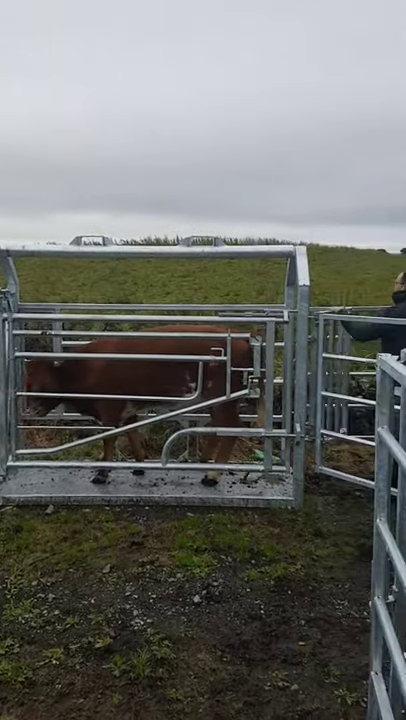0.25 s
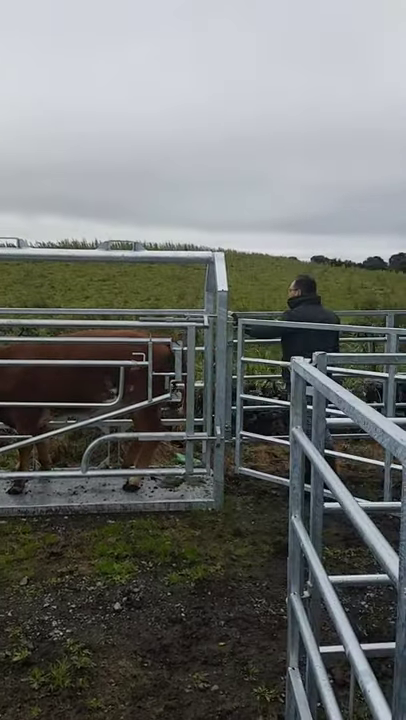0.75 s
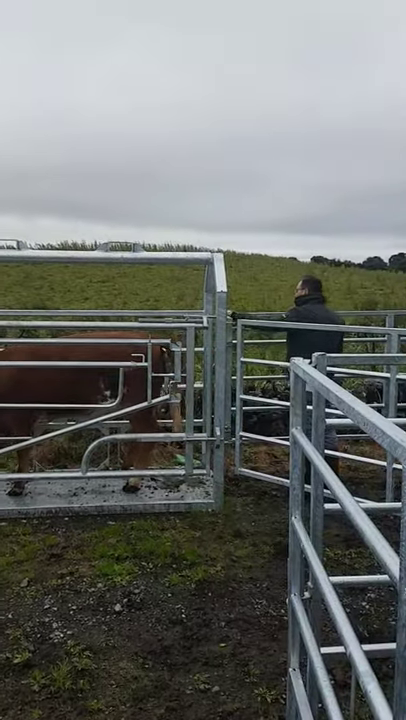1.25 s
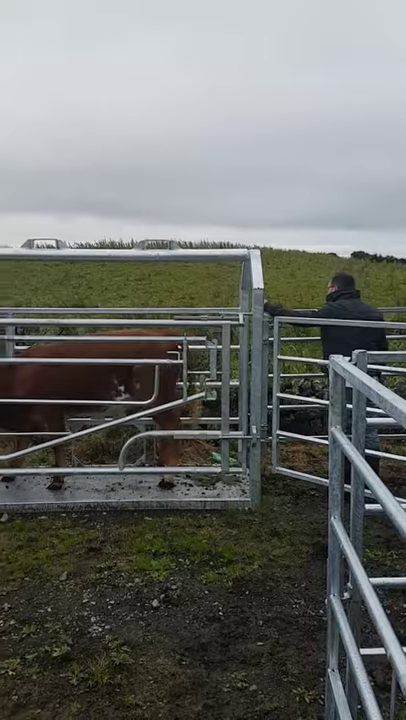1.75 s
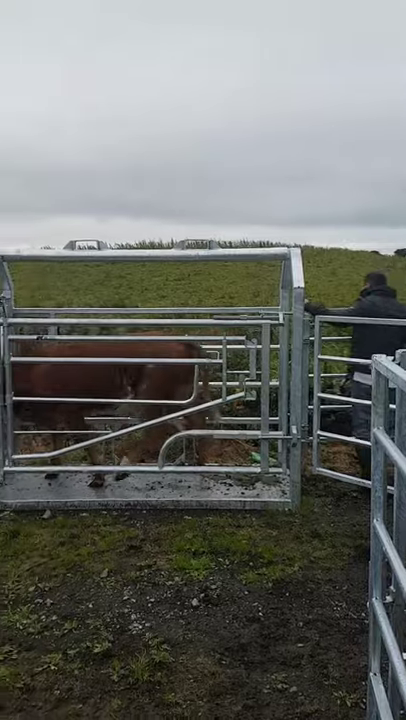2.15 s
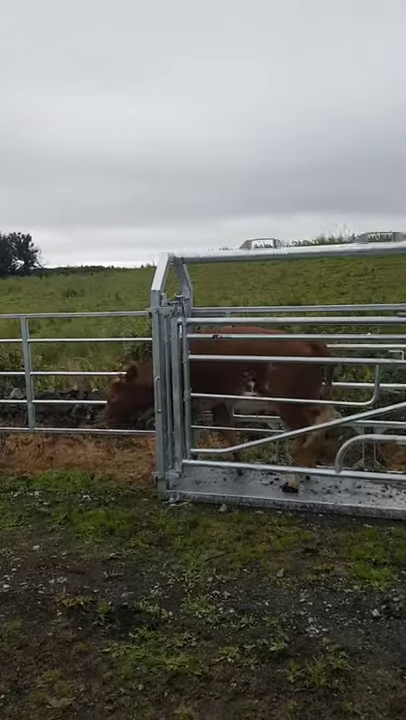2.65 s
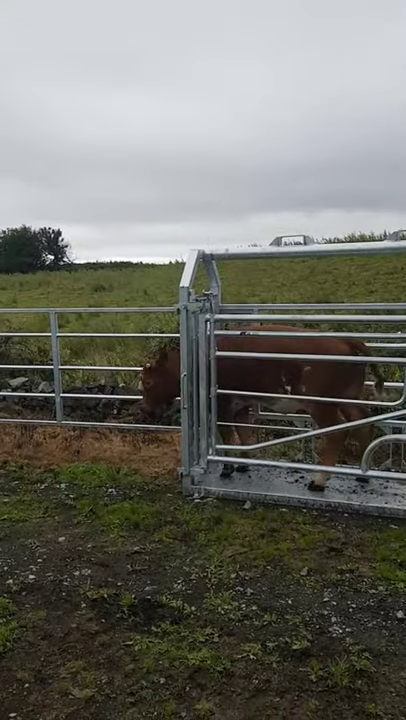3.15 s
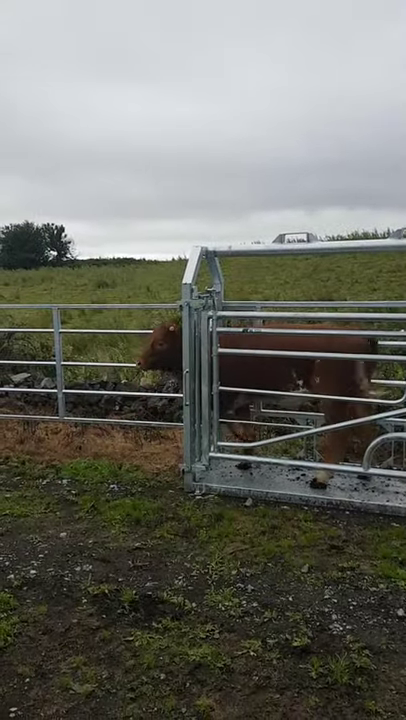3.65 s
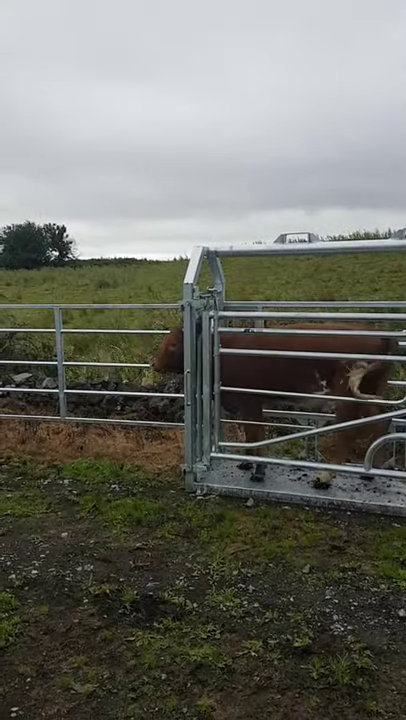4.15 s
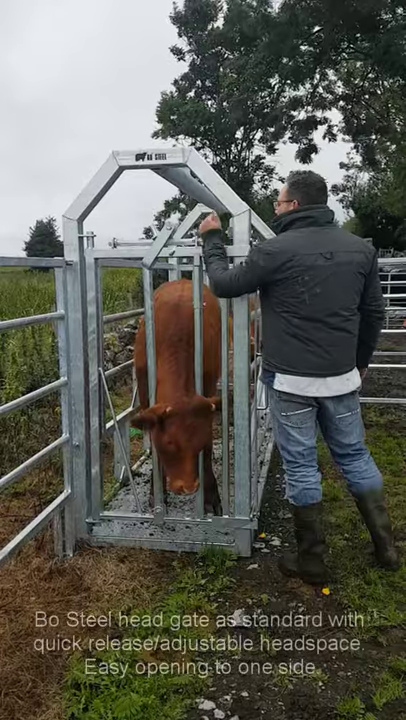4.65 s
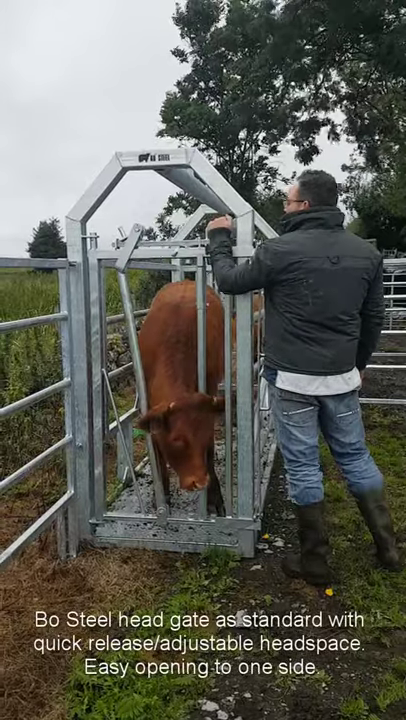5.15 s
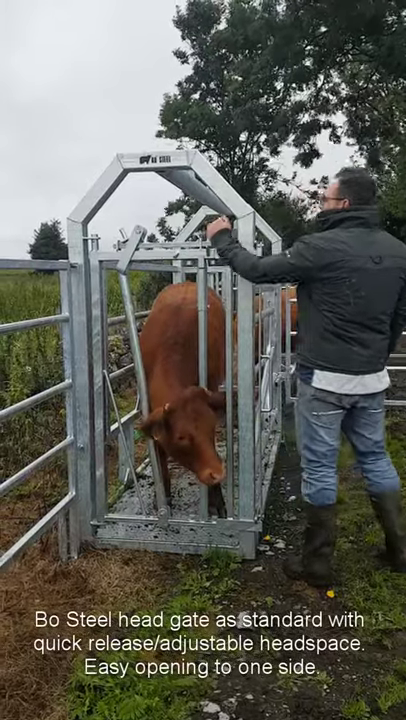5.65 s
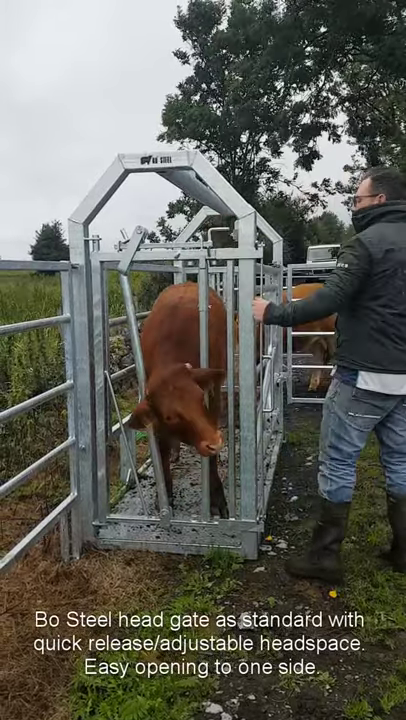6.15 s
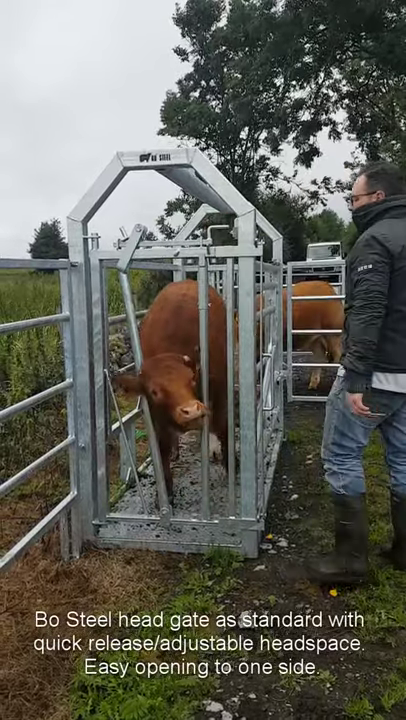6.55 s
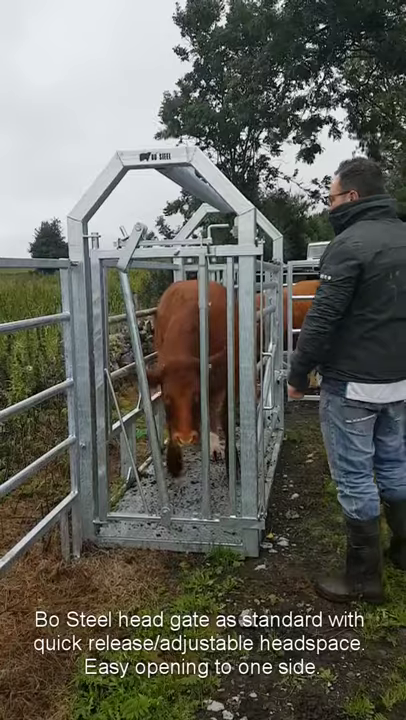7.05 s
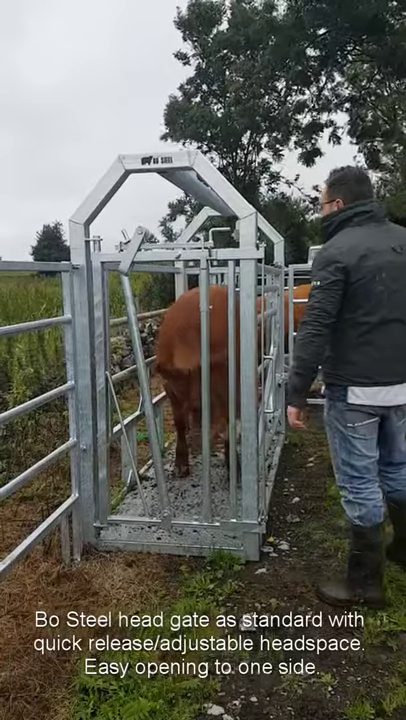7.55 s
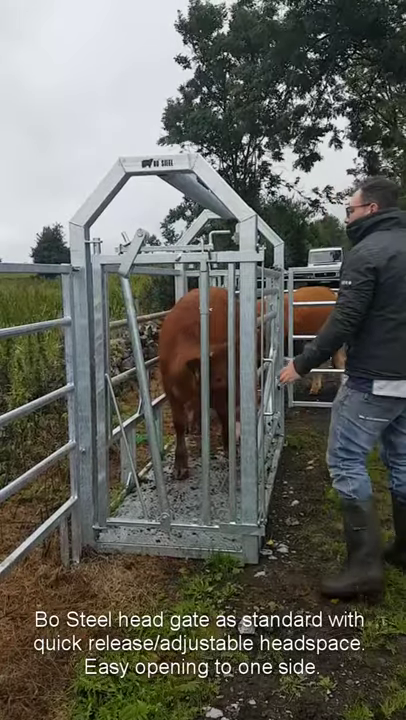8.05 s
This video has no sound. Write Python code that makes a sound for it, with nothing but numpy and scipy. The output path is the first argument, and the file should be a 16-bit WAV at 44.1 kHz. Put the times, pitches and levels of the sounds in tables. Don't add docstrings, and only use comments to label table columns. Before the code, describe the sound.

Hollow steel tubes and loose joints bang and jingle in open air. Two big clashes come early, the second stretch is a rapid chain of hard ratchet clacks with lingering ring. A brief dropout follows, then a moderate cluster of gate knocks and a quick scrape, dying into isolated soft thuds of hooves on a metal floor and small clinks. Wind rumbles unevenly at the stereo microphone; very dry, no echo.

```python
import sys
import numpy as np
from scipy import signal
from scipy.fft import rfft, irfft
from scipy.io import wavfile
from scipy.ndimage import uniform_filter1d

SR = 44100
rng = np.random.default_rng(int(sys.argv[2]) if len(sys.argv) > 2 else 0)


def unload_wav(signal):
    wavfile.write(
        sys.argv[1],
        SR,
        np.round(np.clip(np.atleast_2d(signal).T, -1, 1) * 32767).astype(np.int16),
    )


def boost_factor(decibels):
    exponent = np.asarray(decibels, float) / 20
    return 10 ** exponent


N = 366456
TIME = np.arange(N) / SR
FREQ = np.fft.rfftfreq(N, 1 / SR) + 1e-3

# start_s, end_s
CUT_S = (4.3675, 4.4015)
# start_s, peak_db, panel_hz, t60_s
BLOWS = [(.171, -49, 1490, .06), (0.318, -44.5, 1200, .06), (.589, -44.5, 1400, 0.058),
         (0.2464, -33.5, 2900, 0.097), (0.602, -42, 2850, 0.33), (.653, -32, 1700, 0.2),
         (.714, -15.5, 1260, 0.39), (.824, -5.5, 2380, 0.14), (.854, -19.5, 1310, 0.17),
         (.919, -9.5, 720, 0.076), (1.288, -37, 1220, 0.85), (1.738, -25, 2280, 0.33),
         (1.824, -40, 4800, 0.13), (1.834, -35.5, 6150, 0.28), (1.86, -28.5, 1780, 0.54),
         (2.035, -29, 800, 0.063), (2.048, -21, 900, 0.13), (2.289, -26, 746, 0.2),
         (2.319, -29, 1270, 0.16), (2.358, -27.5, 1310, 0.039), (2.446, -31.5, 3000, 0.057),
         (2.452, -17.5, 1150, 0.25), (2.465, -19.5, 2710, 0.31), (2.509, -21.5, 1770, 0.62),
         (2.617, -21, 4080, 0.05), (2.631, -19, 1100, 0.12), ]
# start_s, peak_db, panel_hz, t60_s
RATCHET = [(2.705, -18.5, 1740, 0.12), (2.735, -8, 770, 0.05), (2.738, -23, 2500, 0.047),
           (2.783, -18, 3000, .05), (2.791, -13, 1510, .04), (2.757, -15.5, 770, 0.053),
           (2.781, -14.5, 900, 0.094), (2.804, -13, 930, 0.052), (2.808, -20.5, 3800, .04),
           (2.815, -11.5, 1270, 0.034), (2.825, -10, 890, 0.1), (2.847, -5, 900, 0.082),
           (2.862, -9, 885, 0.058), (2.872, -10, 802, 0.057), (2.878, -15, 2900, .05),
           (2.898, -12.5, 940, 0.036), (2.905, -20, 2000, .04), (2.921, -18, 850, 0.054),
           (2.957, -23.5, 2880, 0.086), (3.013, -24, 795, 0.17), (3.062, -17.5, 720, 0.19),
           (3.096, -15.5, 783, 0.11), (3.11, -18.5, 1290, 0.083), (3.134, -25, 1430, .08),
           (3.197, -26, 1680, 0.62), (3.276, -35, 2660, .2), (3.304, -30.5, 950, 0.36),
           (3.409, -43.5, 2670, 0.5), (3.693, -29.5, 2920, 0.17), (3.999, -30, 840, 0.14)]
# start_s, peak_db, panel_hz, t60_s
GATE_BLOWS = [(4.641, -29.5, 1320, 0.072), (4.667, -19.5, 634, 0.075), (4.702, -20, 1000, 0.1),
              (4.745, -23, 900, .08), (4.766, -23, 1410, .06), (4.79, -18.5, 730, 0.075),
              (4.825, -19, 1300, 0.05), (4.857, -18, 1114, 0.075), (4.864, -19.5, 1930, 0.24),
              (4.893, -25, 2020, .1), (4.93, -24.5, 1200, 0.72), (4.962, -25, 1155, 0.3),
              (5.015, -28, 720, 0.11), (5.112, -26.5, 1990, 0.11), (5.07, -23, 670, 0.7),
              (5.1549, -28, 2800, 0.27), (5.335, -24, 1210, 0.13), (5.929, -35.5, 1110, 0.19),
              (6.2716, -32, 3830, 0.2), (6.325, -35.5, 1300, .12), (6.3566, -36.5, 4050, 0.24),
              (6.6777, -35.5, 2130, 0.085), (6.681, -40, 5600, 0.22), (6.721, -39, 630, 0.17),
              (6.763, -25.5, 910, 0.1), (7.066, -37.5, 650, 0.28), (7.176, -28.5, 970, 0.16),
              (7.209, -32, 694, 0.18), (7.317, -40.5, 715, 0.18), (7.419, -42.5, 1160, 0.21),
              (8.2234, -25.5, 1970, 0.12), (8.236, -29.5, 2800, 0.55), (8.249, -35.5, 1100, 0.75)]
# start_s, peak_db, jingle_db, t60_s
TICKS = [(0.0844, -43, -21, .043), (0.341, -42, -6, 0.071), (0.4855, -39.5, -12, 0.025),
         (.664, -46, -10.5, .04), (0.726, -37, -8.5, 0.068), (1.602, -53, -7, 0.034),
         (1.828, -44.5, -7.5, 0.11), (2.713, -32.5, -6, 0.07), (2.846, -27, -10.5, 0.079),
         (3.032, -35.5, -4, .1), (7.044, -56, -3, .03), (7.065, -53.5, 0, 0.038), (7.194, -49.5, -2, .04),
         (8.056, -61, 1, .03), (8.091, -65, -5, 0.037), (4.601, -58, -6, .02), (0.821, -20, -6.5, 0.37),
         (1.1192, -40, -5.5, 0.055), (1.451, -42, -18.5, 0.078), (1.524, -32.5, -10, 0.025),
         (2.008, -33, -15, 0.2), (2.451, -32.5, -8.5, 0.45), (2.592, -41, 1, 0.11),
         (3.501, -40.5, -11.5, 0.23), (4.136, -47, -13, 0.22), (4.258, -46, -15.5, 0.08),
         (4.7023, -31.5, -11.5, 0.14), (4.825, -29, -10, 0.045), (4.861, -35, -6, 0.14),
         (4.969, -41, 4, 0.04), (5.1097, -46, -14, 0.038), (5.157, -40.5, -7, 0.24),
         (6.872, -37, -18.5, .15), (6.971, -38.5, -24, 0.32), (7.092, -46.5, -2, 0.04),
         (7.3718, -34, -36, 0.2), (7.5403, -44, -38, 0.084), (7.7228, -44, -37, 0.099),
         (7.818, -52, -10, .075), (8.176, -40.5, -25, 0.19)]
# fullest_s, level_db, build_s, hold_s, jingle_db
SHAKES = [(0.859, -21, 0.21, .0, -23.5), (1.737, -53, 0.05, 0.13, -23), (2.048, -32.5, 0.046, .0, -17.5),
          (2.864, -28.5, 0.76, 0, -19), (3.1, -30.5, 0.53, 0.019, -19.5), (4.667, -32, 0.019, 0.14, -20),
          (4.85, -39.5, .02, 0.095, -38), (5.085, -35, 0.21, 0.027, -27), (1.642, -51, 0.15, 0.091, -28),
          (2.854, -38, .005, 0.012, -9.5), (0.252, -56, 0.036, 0.053, -41), (1.063, -61, 0.044, 0.17, -47)]
# pitch_hz, level_db
STEEL = [(260, -34), (450, -11.5), (541, -15), (737, -4), (1370, -8.5), (1790, -6.5), (2000, -10),
         (2410, -7.5), (3320, -16), (7000, -37), (9100, -44.5), (15400, -120)]
# pitch_hz, level_db
JINGLE = [(2650, -13.5), (4500, -5.5), (4870, -6), (5680, -10.5), (7330, -13), (8550, -12.5), (10500, -15),
          (13400, -11), (14900, -23.5), (16000, -29)]
# pitch_hz, level_db
TINKLE = [(5000, -1), (13000, 1.5)]
# pitch_hz, level_db
SCRAPE = [(4300, -42), (4800, -5), (5150, 2), (5550, -9), (6200, 2), (6800, -20), (7500, -12), (11000, -11),
          (14000, -3), (15500, -14)]
# start_s, peak_db, plate_hz, t60_s
HOOVES = [(0.632, -18.5, 154, 0.1), (0.837, -28, 342, 0.2), (2.048, -25, 394, 0.49),
          (2.857, -11, 725, 0.34), (3.092, -20, 694, 0.36), (3.996, -39.5, 146, 0.32),
          (4.701, -17.5, 510, 0.19), (4.788, -22, 485, 0.6), (5.927, -37.5, 522, 0.47),
          (6.33, -34, 620, 0.25), (6.716, -26, 149, 0.31), (6.721, -32, 560, 0.15),
          (6.761, -24.5, 530, 0.26), (6.801, -35.5, 176, 0.57), (7.064, -30, 204, 0.34),
          (7.087, -32.5, 330, 0.26), (7.204, -27.5, 174, 0.3), (7.315, -32, 177, 0.34),
          (7.41, -31, 161, 0.21), (8.172, -31.5, 473, 0.26), (8.223, -32, 523, 0.63)]
# start_s, end_s, level_db
GUSTS = [(.0, 0.207, -35.5), (0.278, 0.377, -33.5), (0.514, 0.7, -37.5), (0.72, 0.896, -35),
         (0.942, 1.224, -39.5), (1.382, 1.56, -47), (1.628, 1.924, -39), (2.021, 2.145, -34.5),
         (2.305, 2.585, -38.5), (2.638, 2.938, -35), (3.026, 3.346, -47), (3.443, 3.786, -56.5),
         (3.831, 3.916, -51), (4.026, 4.052, -42.5), (4.136, 4.39, -49.5), (4.45, 4.532, -46),
         (4.548, 4.655, -39), (4.71, 5.033, -41.5), (5.11, 5.445, -44), (5.523, 5.614, -37.5),
         (5.7, 5.96, -43), (5.993, 6.439, -43.5), (6.54, 6.837, -46), (6.906, 7.44, -61.5),
         (8.197, 8.31, -54)]
# pitch_hz, level_db
BUFFET = [(12, -29), (20, -6.5), (102, 2.5), (146, 0.5), (175, -3.5), (341, -7.5), (665, -27), (955, -58),
          (1500, -49.5), (1950, -43), (3300, -120)]
# pitch_hz, level_db
FIELD = [(35, -24.5), (60, 3), (172, -1), (244, -2.5), (515, -3), (749, -5.5), (822, -4.5), (4320, -25),
         (4970, -28), (6740, -32), (13000, -30), (16000, -29)]
# first_db, second_db
FIELD_DB = (-50.5, -52.5)
# first_db, second_db
RUSTLE_DB = (-6, -12.5)
LEFT_LAG = (2.6, 5.65)

# pitch_hz, level_db, t60_s
REAR_GATE = [(743, 1, .16), (851, -16, .8), (1007, -13, 1.6), (1125, -7, .3), (1297, 3, .16),
             (1410, -24, 1.1), (1583, -5, 2.2), (1739, -3, .36), (1809, -6, 1.3), (1841, -12, .6),
             (2008, -11, .48), (2342, -3, .25), (2810, -12, .36), (2760, -17, .9), (2907, -14, 1.1),
             (3020, -13, 1.0), (3413, -16, .43), (3639, -8, .6), (3758, -10, .45), (3962, -19, .2),
             (4290, -30, .8), (4823, -19, .8), (4852, -20, .8)]
# start_s, level_db
REAR_HITS = [
    (0.714, -45),
    (.824, -32),
]
# pitch_hz, level_db, t60_s
SIDE_FRAME = [(991, -17, 1.3), (1249, 0, 0.41), (1308, -22, 0.86), (1733, -1, 0.35), (1900, -26, 3.2),
              (2202, -22, 0.54), (2422, -16, 0.36), (2622, -19, 1.3), (2875, -27, 1.1), (3063, -29, 1.4)]
# start_s, level_db
SIDE_HITS = [
    (2.036, -48),
    (2.321, -43.5),
    (2.448, -39.5),
    (2.737, -52),
    (2.851, -35),
    (3.097, -33),
    (3.215, -36.5),
]
# pitch_hz, level_db, t60_s
RAIL = [(1007, -6, 1.6), (1179, -10, .4), (1583, -9, 2.0), (1739, -2, .6), (1766, -4, .4), (1818, -1, 1.2),
        (2622, -11, .9), (3020, -12, .9)]
# start_s, level_db
RAIL_HITS = [(0.083, -62), (.247, -57), (1.287, -55), (1.737, -56.5), (1.862, -52), (2.058, -45.5),
             (2.451, -44), (2.736, -40.5), (2.872, -41), (3.198, -44), (3.693, -51.5), (4, -59)]
# pitch_hz, level_db, t60_s
LEVER = [(1720, -8, .4), (2089, -10, .3), (2810, 2, .3), (2880, -3, .25), (4300, -8, .15), (5755, -14, .12)]
# start_s, level_db
LEVER_HITS = [
    (4.668, -44),
    (4.701, -33),
    (4.79, -46),
]
# pitch_hz, level_db, t60_s
HEAD_GATE = [(619, -7, 2.2), (727, -3, 0.8), (851, -3, 0.78), (1238, -4, .4), (1658, -14, 1.2),
             (1766, -4, 0.44), (1938, -10, 0.73), (2579, -13, 0.97)]
# start_s, level_db
HEAD_HITS = [
    (5.071, -44),
]
# pitch_hz, level_db, t60_s
YOKE = [(1378, -16, 1.0), (1583, -11, 0.36), (1760, 0, 0.18), (2299, -22, 1.2)]
# start_s, level_db
YOKE_HITS = [
    (6.873, -52),
    (6.92, -55),
    (7.181, -44),
    (7.26, -55),
]
# pitch_hz, level_db, t60_s
LATCH = [(2606, -10, 0.25), (2789, 0, 0.27), (2850, -3, .22), (2939, -5, 0.24), (3052, -9, 0.26)]
# start_s, level_db
LATCH_HITS = [
    (6.272, -56),
    (6.973, -49),
    (7.371, -47),
    (7.54, -55),
    (7.722, -56),
    (7.86, -63),
]
# pitch_hz, level_db, t60_s
CHAIN = [(2900, -3, .5), (3020, 0, .7), (3640, -10, .2)]
# start_s, level_db
CHAIN_HITS = [
    (3.299, -59),
    (3.506, -57),
]
# pitch_hz, level_db, t60_s
BAR = [(740, 0, .14), (812, -6, .12), (885, -1, .14), (924, -3, .12), (960, -3, .12), (1115, -7, .12)]
# start_s, level_db
BAR_HITS = [(2.735, -33.5), (2.757, -27.5), (2.781, -26), (2.804, -18), (2.826, -23), (2.847, -28.5),
            (2.873, -24.5), (2.895, -34), (2.69, -31), (3.013, -33), (3.04, -33), (3.063, -33)]
# pitch_hz, level_db, t60_s
PIN = [(2590, -6, .3), (3520, -5, .12), (4075, -3, .12)]
# start_s, level_db
PIN_HITS = [
    (2.618, -45),
    (3.698, -46),
]
# pitch_hz, level_db, t60_s
HEAD_GATE_LATER = [(694, -4, .77), (851, -5, 1.1), (1179, -12, 1.1), (1238, -1, 1.4), (1658, -2, .5), (1766, -6, .57),
                   (1938, -2, .47), (2116, -11, .56), (2503, -3, .33), (2579, -9, .8), (2821, -10, .5)]
# start_s, level_db
HEAD_LATER_HITS = [
    (5.338, -47.5),
]
# pitch_hz, level_db, t60_s
HINGE = [(743, -8, .2), (1174, -6, .25), (1395, -3, .15), (1425, 0, .15)]
# start_s, level_db
HINGE_HITS = [
    (4.716, -32),
    (4.866, -41),
]
# full_strength_s (fed by the rattle), roughness_rad
FEEDS = [(.12, .06), (.04, .06), (.04, .08), (.025, .2), (.05, .1), (.02, .2), (.015, .17), (.03, .1),
         (.0, .06), (.015, .12), (.02, .07), (.075, .2)]

BLOW_JINGLE_DB, DULL_DB_PER_S = -26.5, 22.5
TICK_HZ, TICK_SPREAD = (2680, 2850), 0.098
BROAD_ABOVE_HZ = 4500
CRACK, CRACK_S = 0.95, 0.0022
JINGLE_SHARED = 0.5
SHAKE_FROM_DB, SHAKE_FALL_DB_PER_S = -37.5, 102
SCRAPE_S, SCRAPE_LENGTH_S, SCRAPE_DB, SCRAPE_SAG_DB = 4.969, 0.092, -38, -8.5
GUST_RISE_S, GUST_DROP_S, LULL_DB = 0.06, 0.071, -70
WIND_TURNS_S, WIND_LEFT_DB = 5.6, (4.5, -3.5)


def unit(x):
    return x / np.sqrt(np.mean(x ** 2))


def colour(x, table):
    hz, db = np.transpose(table)
    gain = boost_factor(np.interp(np.log(FREQ), np.log(hz), db))
    return irfft(rfft(x, N) * gain, N)


def resonance(x, hz, width):
    return signal.lfilter(*signal.iirpeak(hz, hz / width, fs=SR), x)


def walk(rate):
    k = int(SR / rate)
    levels = np.repeat(rng.standard_normal(N // k + 1), k)
    return unit(uniform_filter1d(uniform_filter1d(levels, k), k)[:N])


def clicks(count, scatter_db):
    chance = rng.random((3, N))
    happens = chance[0] < count / SR
    size = boost_factor(np.minimum(-scatter_db * np.log(1 - chance[2]), 15))
    return unit(happens * np.sign(chance[1] - .5) * size)


def trapeze(start, stop, rise, drop):
    return np.interp(TIME, [start - rise, start, stop, stop + drop], [0, 1, 1, 0])


def add(out, x, i):
    out[:, i:i + x.shape[1]] += x[:, :N - i]


def body(force, apart, t60_low, t60_high):
    t = TIME[:min(int(SR * max(t60_low, t60_high)), SR // 4)]
    noise = rng.standard_normal((3, len(t))) * (1 + CRACK * np.exp(-t / CRACK_S))
    low = signal.lfilter([.2], [1, -.8], noise)
    high = (noise - low) * boost_factor(-60 * t / t60_high) / np.sqrt(t60_high)
    low = 2 * low * boost_factor(-60 * t / t60_low) / np.sqrt(t60_low)
    response = low[0] + high[0] + apart * (0.16 * low[1:] + high[1:])
    return signal.fftconvolve(np.atleast_2d(force), response / np.sqrt(SR / 10), axes=1)


def knock(hit, jingle_db, taps, fine, clang, bright):
    s, db, hz, t60 = hit
    i = int(s * SR)
    t = TIME[:min(N - i, SR // 3)]
    fall = boost_factor(db - 60 * t / np.clip(t60, .01, .5))
    rattle = fall * taps[i:i + len(t)]
    rattle[0] += 17.0 * boost_factor(db)
    width = (0.06 if hz < BROAD_ABOVE_HZ else .45) * hz
    panel = boost_factor(-.7 * np.interp(hz, *np.transpose(STEEL))) * resonance(rattle, hz, width)
    force = 0.39 * rattle + 0.45 * panel
    add(clang, body(force, 1.37, t60_low=min(0.35, 0.0915 + 1.3 * t60), t60_high=0.14), i)
    fine_force = boost_factor(jingle_db) * fall * fine[:, i:i + len(t)]
    add(bright, body(fine_force, 1.5, t60_low=.03, t60_high=.03), i)


def shaking(taps, fine, clang, jingle):
    level = bright = 0
    for s, db, build, hold, jingle_db in SHAKES:
        rise_db = SHAKE_FROM_DB * np.maximum(s - TIME, 0) / max(build, .005)
        fall_db = SHAKE_FALL_DB_PER_S * np.maximum(TIME - s - hold, 0)
        swing = boost_factor(db + rise_db - fall_db)
        level = level + swing
        bright = bright + boost_factor(jingle_db) * swing
    shake, jangle = level * taps, bright * fine
    for i in range(0, N, 2048):
        if i / SR < 3.55 or 4.55 < i / SR < 5.45:
            add(clang, body(shake[i:i + 2048], 2.4, t60_low=0.13, t60_high=0.078), i)
            add(jingle, body(jangle[:, i:i + 2048], 1.5, t60_low=0.023, t60_high=0.037), i)


def lever_scrape(fine):
    slide = trapeze(SCRAPE_S, SCRAPE_S + SCRAPE_LENGTH_S, 0.0022, 0.04)
    progress = np.clip((TIME - SCRAPE_S) / SCRAPE_LENGTH_S, 0, 1)
    return slide * boost_factor(SCRAPE_DB + SCRAPE_SAG_DB * progress) * unit(colour(fine, SCRAPE))


def steelwork():
    taps = clicks(900, 4.3)
    fine = np.array([clicks(count=3000, scatter_db=1.0) for _ in range(3)])
    fine = unit(JINGLE_SHARED * fine[0] + 0.85 * fine[1:])
    clang, jingle, tinkle = np.zeros((3, 2, N))
    for hit in BLOWS + RATCHET + GATE_BLOWS:
        knock(hit, BLOW_JINGLE_DB - DULL_DB_PER_S * hit[3], taps, fine, clang, jingle)
    for s, db, jingle_db, t60 in TICKS:
        hz = TICK_HZ[int(s > CUT_S[0])] * (1 + TICK_SPREAD * rng.uniform(-0.35, 1))
        knock((s, db, hz, t60), jingle_db, taps, fine, clang, tinkle)
    shaking(taps, fine, clang, jingle)
    small_parts = colour(jingle + colour(tinkle, TINKLE), JINGLE)
    return boost_factor(10.0) * colour(clang, STEEL) + boost_factor(8.5) * small_parts + lever_scrape(fine)


def tubes(modes, strokes, settle, rough):
    out = np.zeros((2, N))
    hz, db, t60 = np.transpose(modes)[:, :, None]
    t = TIME[:3 * SR // 2]
    for s, hit_db in strokes:
        chance = rng.standard_normal((5, len(modes), 1))
        decay_db = 60 * np.maximum(t - settle, 0) / np.clip(t60, .12, 2.2)
        beat = 1 + 0.3 * np.sin(2 * np.pi * 8.26 * chance[1] * t + 3 * chance[2])
        onset = 1 - np.exp(-t / 0.0014)
        size = boost_factor(hit_db + db + chance[0] - decay_db) * beat * onset
        steps = rng.standard_normal((len(modes), len(t) // 50))
        wander = rough * np.repeat(np.cumsum(steps, axis=1), 50, axis=1)
        wander = uniform_filter1d(wander, size=100)
        phase = 2 * np.pi * hz * t + wander + .25 * chance[3:]
        add(out, np.sum(size * np.sin(phase), axis=1), int(s * SR))
    return out


def ringing_tubes():
    sets = ((REAR_GATE, REAR_HITS), (SIDE_FRAME, SIDE_HITS), (RAIL, RAIL_HITS), (LEVER, LEVER_HITS),
            (HEAD_GATE, HEAD_HITS), (YOKE, YOKE_HITS), (LATCH, LATCH_HITS), (CHAIN, CHAIN_HITS),
            (BAR, BAR_HITS), (PIN, PIN_HITS), (HEAD_GATE_LATER, HEAD_LATER_HITS), (HINGE, HINGE_HITS))
    return sum(tubes(*part, *feed) for part, feed in zip(sets, FEEDS))


def floor_plate():
    grit, out = clicks(500, 1.4), np.zeros((1, N))
    for s, db, hz, t60 in HOOVES:
        i = int(s * SR)
        t = TIME[:min(N - i, SR // 3)]
        push = boost_factor(db - 60 * t / np.clip(t60, .01, .5)) * grit[i:i + len(t)]
        push[0] += 0.99 * boost_factor(db)
        push = resonance(push, 250, 770)
        plate = boost_factor(14.5) * resonance(push, hz, 58) + boost_factor(5.0) * resonance(push, 340, 470)
        add(out, plate[None], i)
    return colour(out, [(20, 3.0), (900, -3.5), (3000, -28.0)])


def wind():
    gusts = boost_factor(LULL_DB)
    for start, stop, db in GUSTS:
        gusts = gusts + boost_factor(db) * trapeze(start, stop, GUST_RISE_S, GUST_DROP_S)
    pan_db = np.where(TIME < WIND_TURNS_S, *WIND_LEFT_DB)
    out = []
    for sign in (1, -1):
        puff_db = 7 * np.tanh((1.3 * walk(17) + 4.9 * walk(50)) / 7)
        eddies = rng.standard_normal(N) + 0.57 * clicks(count=200, scatter_db=3.5)
        buffet = boost_factor(puff_db) * unit(colour(eddies, BUFFET))
        rustle = clicks(500, 3.2)
        for _ in range(3):
            rustle = resonance(rustle, 308, 445)
        rustle_db = 1.49 * puff_db + np.where(TIME < CUT_S[0], *RUSTLE_DB)
        rustle = boost_factor(rustle_db) * unit(rustle)
        out.append(gusts * boost_factor(sign * pan_db / 2) * (buffet + rustle))
    return np.array(out)


def field():
    mid, left, right = (unit(colour(rng.standard_normal(N), FIELD)) for _ in range(3))
    db = np.where(TIME < CUT_S[0], *FIELD_DB) + 0.9 * walk(2.43)
    return boost_factor(db) * (0.39 * mid + 0.78 * np.array([left, right]))


def scene():
    steel = steelwork() + floor_plate() + ringing_tubes()
    spectrum = rfft(steel[0])
    first, second = (irfft(spectrum * np.exp(-2j * np.pi * FREQ * lag / SR), N) for lag in LEFT_LAG)
    left = boost_factor(-1.5) * np.where(TIME < CUT_S[0], first, second)
    return np.array([left, steel[1]]) + wind() + field()


def top_cut(x):
    return signal.sosfilt(signal.butter(12, 15850, fs=SR, output="sos"), x)


def record(dry):
    dry = signal.sosfilt(signal.butter(2, 35, "high", fs=SR, output="sos"), dry)
    dry = signal.sosfilt(signal.ellip(8, .2, 60, 15750, fs=SR, output="sos"), dry)
    start, stop = CUT_S
    gap_db = np.interp(TIME, [start, start + .002, stop, stop + .002], [0, -22, -48, 0])
    return top_cut(np.tanh(1.108 * dry) / 1.09 * boost_factor(gap_db))


dry = scene()
out = record(dry)
unload_wav(out)
```